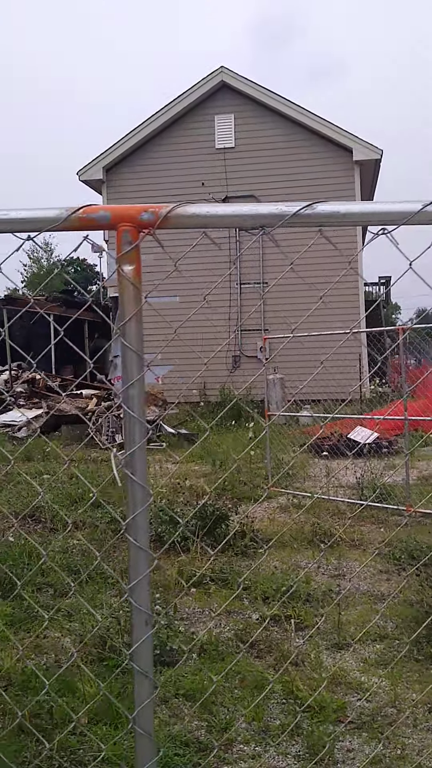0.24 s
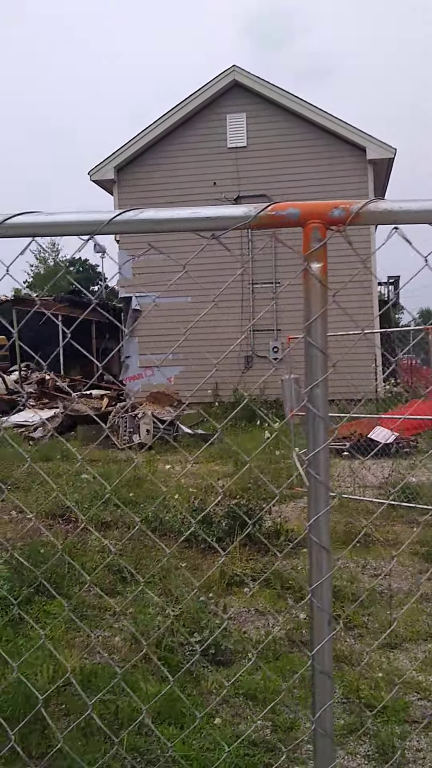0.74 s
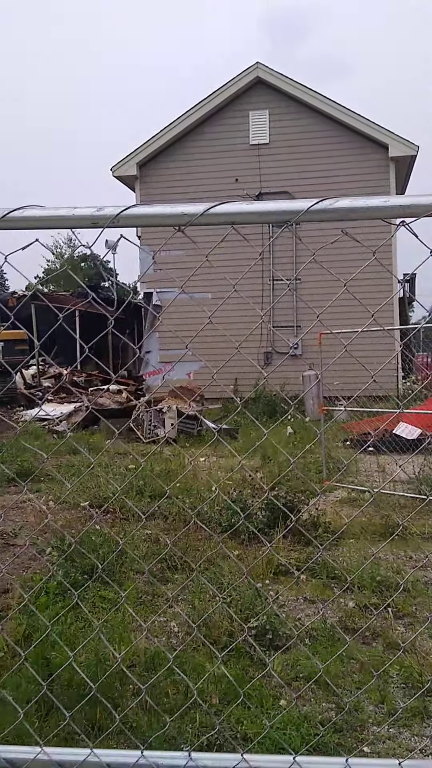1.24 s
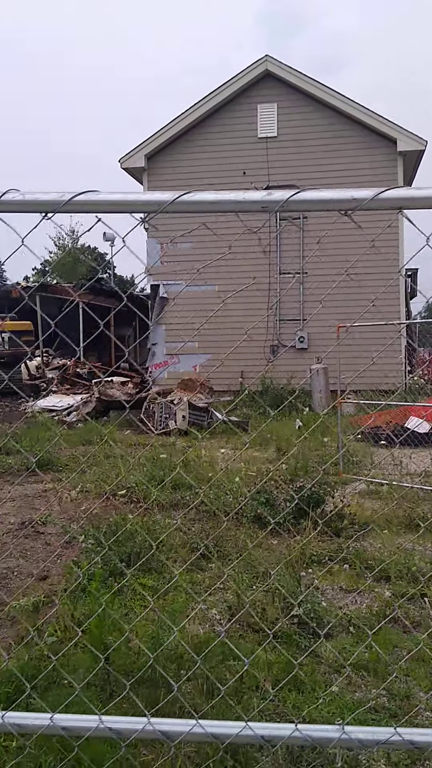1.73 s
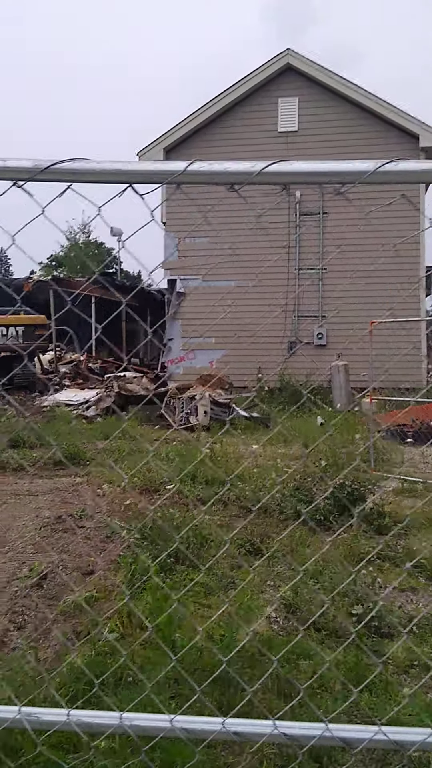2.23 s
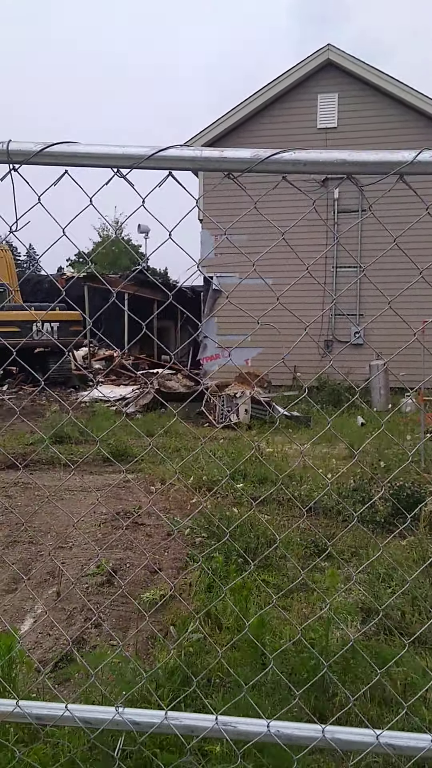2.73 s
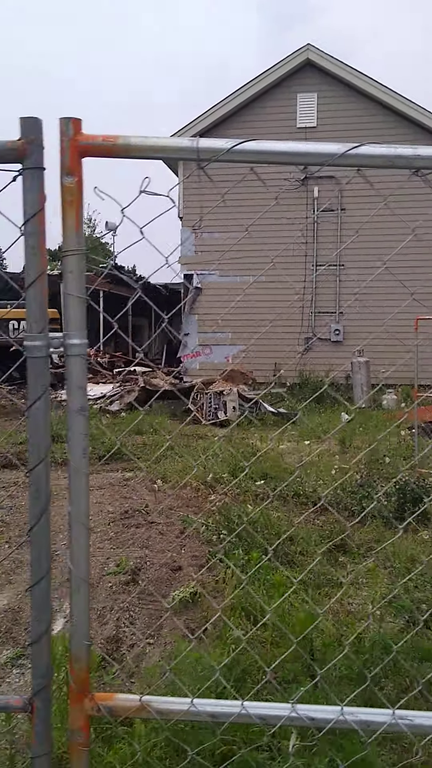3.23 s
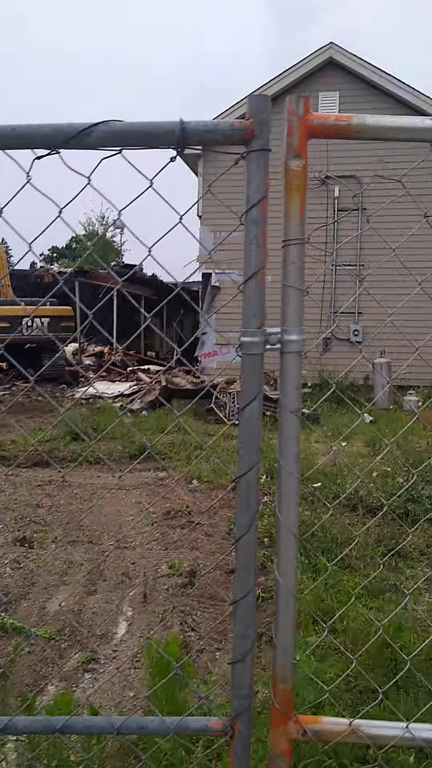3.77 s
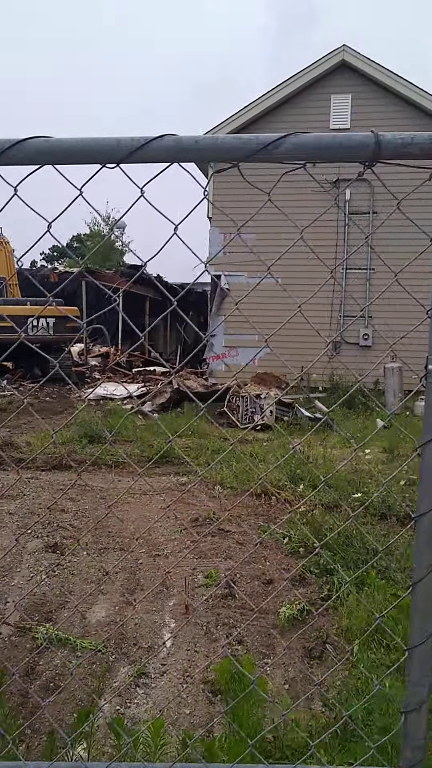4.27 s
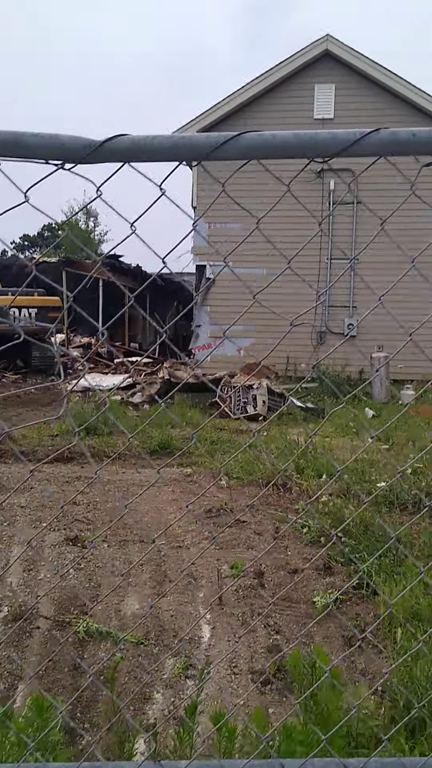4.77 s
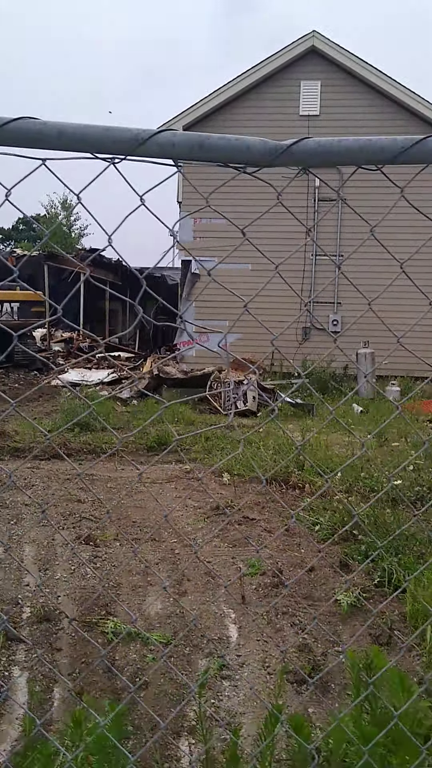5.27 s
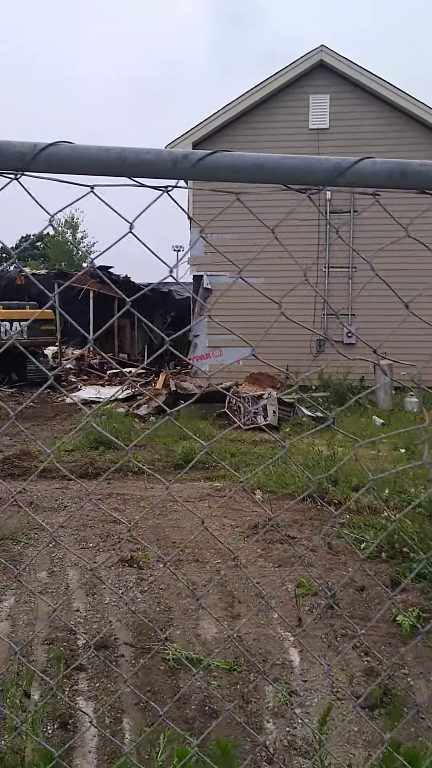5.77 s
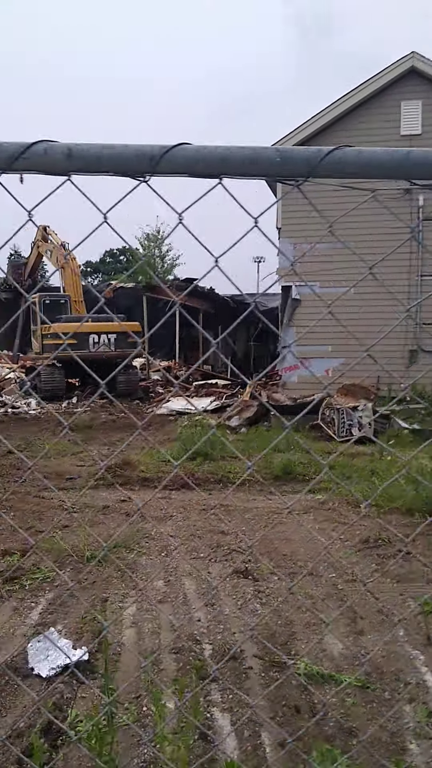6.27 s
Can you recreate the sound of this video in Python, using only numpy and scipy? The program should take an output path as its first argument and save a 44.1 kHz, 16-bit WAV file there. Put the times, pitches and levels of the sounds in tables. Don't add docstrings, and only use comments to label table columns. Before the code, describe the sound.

A wooden house is demolished across an open yard, heard through a phone microphone with short scattered echoes. A low diesel drone, near 100 Hz, hums quietly throughout beneath faint fan hiss leaning right. From 0 to 0.4 s small knocks, cracks and glassy clinks; from 0.57 to 1.0 s a dense heavy crash of hollow planks, thuds and sliding debris, then loose ticks. At 1.5 s a second crash bursts out, bright and brittle, with a low thud, peaking again around 1.9 s. A lull follows, then sharp stick snaps at 2.55 and 2.8 s, clatter at 3.1 to 3.5 s and a rattling cluster at 3.8 to 4.2 s. Thereafter only sparse knocks at 4.6 to 5.4 s, with thin hydraulic whines. A final sharp crack and tumble comes at 5.8 to 6.0 s; a few ticks fade as the engine swells and sags in pitch until 6.5 s.

```python
import sys
import numpy as np
from scipy import signal
from scipy.fft import rfft, irfft, next_fast_len
from scipy.io import wavfile
from scipy.ndimage import uniform_filter1d

SR = 44100
rng = np.random.default_rng(int(sys.argv[2]) if len(sys.argv) > 2 else 0)


def makeup_ratio(level_db):
    decades = np.asarray(level_db, float) / 20
    return 10 ** decades


def persist_wave(psi):
    counts = np.round(np.clip(psi, -1, 1) * 32767).astype(np.int16)
    wavfile.write(sys.argv[1], SR, np.atleast_2d(counts).T)


N = 286738
SHORT_TIME = dict(fs=SR, nperseg=512, noverlap=384)

# (t/s, peak level/dB, treble re peak/dB, die-away/s)
PLANKS = [(.1182, -30.5, -9.5, 0.47), (.3203, -24.5, -65, 0.33), (.5719, -26, -0.5, 1),
          (.581, -17.5, -47, 1), (.6192, -22, -17, 1), (.6522, -14.5, -8, 0.95), (.6803, -17, -36, 0.13),
          (.7594, -16.5, -5, 0.26), (.8676, -17, -7.5, 0.3), (.9794, -21, -9.5, 0.13),
          (1.5544, -19.5, -45, 0.063), (1.8674, -17, -9, 0.71), (1.8871, -14, -8, 0.18),
          (2.7175, -33, -26, 0.056), (2.814, -26, -8.5, 0.16), (3.1363, -22.5, -35, 0.34),
          (3.2493, -25, -15, 0.23), (3.8283, -21.5, -17.5, 0.17), (4.6997, -33.5, -36, 1),
          (5.9309, -19, -13.5, 0.11)]
# (t/s, peak level/dB, treble re peak/dB, die-away/s)
PANES = [(.2942, -26, -8.5, 0.17), (.3996, -36, 0, 0.18), (.819, -25.5, -20, 1), (1.5181, -17.5, -2, 0.79),
         (1.534, -15, -37, 0.18), (1.6079, -22, 6, 0.34), (1.704, -23, -5, 0.19), (1.7402, -22.5, -2, 0.85),
         (1.8178, -20.5, 17, 1), (2.9912, -29.5, -3.5, 0.32), (5.851, -31, 28, 0.25),
         (5.8784, -24, -10, 0.53)]
# (t/s, peak level/dB, treble re peak/dB, die-away/s)
LATHS = [(1.9194, -19.5, -3, 0.36), (1.9924, -21, -14.5, 0.29), (2.535, -18.5, -18.5, 0.3),
         (2.5628, -21, -23, 0.29), (2.7578, -31, -7, 0.54), (2.7721, -22, -10.5, 0.13),
         (2.8373, -28, -17.5, 1), (3.1168, -23.5, -9, 0.25), (3.1615, -17, -7.5, 0.25),
         (3.3703, -24, -18, 1), (3.4739, -18.5, -4, 0.32), (3.5094, -21, -5, 0.18), (3.5401, -23, -8, 0.55),
         (3.911, -19, -6.5, 0.16), (3.9594, -44, 8, 0.43), (3.9848, -21.5, -16, 0.18),
         (4.0089, -16.5, -4, 0.22), (4.0652, -27, -30, 0.2), (4.1003, -21, -12, 0.27),
         (4.566, -20, -11, 0.13), (5.898, -14.5, -12, 0.14), (6.0087, -57, -1, 0.13)]
# (t/s, peak level/dB, treble re peak/dB)
CHIPS = [(.0044, -27, -7.5), (0.156, -26, -42), (1.1428, -22, -28), (1.1695, -40, -26), (1.254, -30.5, -14),
         (2.159, -28, -15), (2.368, -25.5, -23.5), (2.419, -35, -7), (3.091, -27.5, -57),
         (4.3913, -24, -30), (4.4567, -31, -19), (4.753, -25.5, -12), (4.877, -31.5, -4), (5.24, -28, -49),
         (5.288, -30.5, -18), (5.408, -28, -63), (5.781, -26.5, -51), (5.799, -27, -9), (6.109, -33, -3),
         (3.809, -42, -21), (4.901, -35, -16), (6.06, -41, -49), (6.165, -40, -24), (1.3178, -40, -11)]


def breaking_boards():
    hits = np.zeros((N, 2))
    chips = [(*row, 0.15) for row in CHIPS]
    kinds = [(PLANKS, 3.64, -5.5), (PANES, 4.6, -25), (LATHS, 3.12, -47), (chips, 2.12, -14)]
    for rows, top, body_db in kinds:
        for s, db, treble_db, t60 in rows:
            add(hits, s, crack(db, treble_db, top, t60, body_db).T)
    return hits.T


def crack(db, treble_db, top, t60, body_db):
    hz, t, z = shower(round(.3 * SR))
    treble_octaves = np.clip(np.log2((hz + 1) / 4000), 0, 2)
    depth_db = 8.3 + 2.1 * treble_octaves * np.minimum(t / 0.072, 1)
    modes = np.minimum(patches(z.shape[1:], 1, 57.7), 1.7)
    rings_db = depth_db * (modes - 0.8) + 5.7
    band_t60 = np.clip(t60, .03, 1.2) * (2000 / np.maximum(hz, 500)) ** 0.51
    z = z * makeup_ratio(wood_db(hz, treble_db, top, body_db) + rings_db - 60 * t / band_t60)
    sound = signal.istft(z, **SHORT_TIME)[1]
    age = np.arange(sound.shape[1]) / SR
    onset = 1 - np.exp(-age / 0.0007)
    sound = sound * onset * makeup_ratio(1.7 * np.exp(-age / 0.0034))
    return makeup_ratio(db - 15.0) * sound / np.std(sound[:, :700])


# (f/Hz, likeness)
WOOD_SAME = [(60, 1), (180, 1), (550, 0.4), (1650, 0.96), (4970, 0.1), (15000, 0.55)]


def shower(length):
    noise = rng.standard_normal((2, length))
    size = np.minimum(rng.exponential(1, length), 4)
    clumps = evened(uniform_filter1d(size - size.mean(), size=160))
    clicks = noise * makeup_ratio(2.2 * size + 2.3 * clumps)
    hz, t, (left, other) = signal.stft(clicks, **SHORT_TIME)
    same = np.clip(read(WOOD_SAME, hz), 0, 1)[:, None]
    right = same * left + np.sqrt(1 - same ** 2) * other
    return hz[:, None], t, np.array([left, right])


# (f/Hz, level per Hz/dB)
WOOD = [(530, -30), (900, -48), (1100, -7), (1600, -7), (2830, -7.5), (3040, -7.5), (3310, -10.5),
        (6530, -19), (10400, -24.5), (15600, -29)]


def wood_db(hz, treble_db, top, body_db):
    octaves = np.log2((hz + 1) / 1000)
    treble = np.clip((octaves - 1.4) / 1.45, 0, 1)
    boards_db = read(WOOD, hz) + treble * (treble_db + 14.0) - 24 * np.maximum(octaves - top, 0)
    body = np.exp(-((octaves + 0.012) / 0.3) ** 2)
    return 10 * np.log10(makeup_ratio(2 * boards_db) + body * makeup_ratio(2 * (body_db - 4.5)))


# (t/s, level/dB, ring f/Hz, second ring f/Hz, ring time/s)
THUDS = [(.15, -38.5, 780, 1250, 0.038), (0.591, -47.5, 349, 487, 0.77), (0.661, -34, 459, 514, 0.18),
         (.77, -32, 821, 957, 0.1), (.655, -31, 819, 941, 0.27), (.88, -42.5, 385, 624, 0.063),
         (1.019, -52, 536, 537, 0.19), (1.517, -26, 198, 222.4, 0.19), (1.519, -32, 486, 557, 0.42),
         (1.78, -52, 542, 570, 0.15), (1.92, -45, 548, 620, 0.076), (1.879, -35, 878, 939, 0.15),
         (2.812, -26, 630, 767, 0.047), (4.018, -59, 383, 384, 0.27), (5.212, -37.5, 783, 830, 0.03),
         (5.228, -42.5, 565, 581, 0.14), (5.85, -35, 311, 436, 0.11), (5.894, -37, 348, 482, 0.11)]
# (t/s, level/dB, ring f/Hz, second ring f/Hz, ring time/s)
SCRAPS = [(.005, -45.5, 3203, 3166, 0.07), (.12, -44.5, 6580, 7200, 0.088), (0.123, -51, 4060, 3070, 0.18),
          (.128, -43.5, 3170, 11800, 0.034), (0.292, -38.5, 9150, 9700, 0.078),
          (.296, -45, 6640, 4270, 0.11), (0.399, -48.5, 4310, 3120, 0.079), (1.165, -35, 3890, 4130, 0.033),
          (1.228, -51, 3110, 3150, 0.12), (1.288, -56, 9480, 9500, 0.25), (2.158, -42, 1410, 1590, 0.26),
          (2.419, -43.5, 3110, 3540, 0.11), (2.555, -33.5, 1033, 3000, 0.14),
          (2.731, -39.5, 994, 3830, 0.071), (2.77, -27, 3425, 2477, 0.047),
          (2.987, -38.5, 966, 3680, 0.089), (4.096, -38.5, 1307, 886, 0.069), (4.56, -40, 4650, 2010, 0.14),
          (4.693, -41, 966, 1270, 0.12), (5.242, -31, 1240, 1485, 0.088), (5.28, -45.5, 3470, 2800, 0.11),
          (1.14, -44, 4220, 4820, 0.042), (1.19, -44, 965, 975, 0.073), (1.251, -40, 3120, 4130, 0.059),
          (1.316, -51, 3140, 3200, .06), (1.346, -51.5, 3136, 3210, 0.068), (1.39, -53, 9450, 6360, .15),
          (3.089, -41, 1233, 1920, 0.1), (3.369, -46, 4900, 3700, 0.15), (3.789, -53, 5130, 4130, 0.13),
          (5.407, -46, 1316, 2100, 0.041), (5.872, -60, 13900, 12300, .3), (6.108, -44.5, 7600, 8600, .04),
          (6.02, -54.5, 6930, 7300, 0.14), (2.365, -37.5, 3205, 2104, 0.058),
          (2.54, -56.5, 10670, 9200, 0.52), (0.2, -59, 9600, 9700, 0.2), (.294, -51, 15200, 12100, 0.22)]
# (t/s, peak level/dB, ring f/Hz)
SNAPS = [(0.025, -39, 2010), (0.153, -39, 1870), (0.192, -29, 1935), (0.209, -46, 2130),
         (0.239, -31, 1940), (0.249, -32, 1970), (0.296, -47, 9700), (0.318, -28, 2260),
         (0.345, -43, 2500), (0.58, -38, 2310), (0.595, -32, 2220), (0.603, -29, 1595),
         (0.624, -34, 2110), (0.632, -41, 2080), (0.653, -22, 2160), (0.67, -14.5, 1660),
         (0.682, -31, 2410), (0.698, -31, 2090), (0.73, -18, 2194), (0.779, -26.5, 1164),
         (0.819, -24, 3080), (0.847, -21, 2840), (0.871, -25, 3130), (0.88, -21, 1840),
         (0.893, -30, 2990), (0.902, -33, 1770), (0.915, -31, 2280), (0.944, -40, 3070),
         (0.96, -36, 1860), (0.976, -33, 3130), (0.985, -35, 2180), (1.024, -49, 2200),
         (1.087, -28, 1900), (1.098, -30, 1715), (1.141, -40, 2250), (1.157, -39, 1940),
         (1.167, -25.5, 1853), (1.2, -46, 1870), (1.253, -26, 1740), (1.276, -49, 2040),
         (1.533, -35, 2070), (1.541, -35, 2220), (1.557, -31, 2160), (1.621, -23.5, 9900),
         (1.688, -50, 1690), (1.709, -25, 1990), (1.733, -31, 2080), (1.776, -26.5, 1458),
         (1.87, -24, 2440), (1.891, -14, 6470), (1.918, -18, 2063), (1.94, -19, 1480),
         (1.967, -22, 1643), (2.011, -29, 1810), (2.037, -41, 1680), (2.051, -27, 2090),
         (2.157, -32, 1475), (2.233, -31.5, 1746),
         (2.37, -52, 2250), (2.388, -53, 2040), (2.541, -22, 1960), (2.564, -20, 3045),
              (2.591, -39, 2240), (2.677, -40, 2230), (2.716, -28, 2025), (2.773, -23, 3400),
              (2.8, -32, 2290), (2.816, -26, 2370), (2.837, -49, 2000), (2.998, -27.5, 2165),
              (3.021, -35, 2140), (3.119, -27, 2050), (3.135, -25.5, 1830), (3.164, -42, 2040),
              (3.173, -34, 2830), (3.252, -34, 1990), (3.284, -34.5, 1630), (3.301, -30, 2500),
              (3.418, -31, 2220), (3.474, -15, 2365), (3.488, -24, 2160), (3.509, -23, 2110),
              (3.542, -23, 2180), (3.624, -29, 1380), (3.663, -36, 1890), (3.838, -26.5, 2340),
              (3.912, -19, 1980), (3.963, -24, 2110), (3.985, -22, 1746), (4, -37, 1450),
              (4.013, -22, 2380), (4.035, -31, 2320), (4.066, -20, 1460), (4.079, -25, 1325),
              (4.099, -18, 1432), (4.123, -43, 1730), (4.155, -37, 1840), (4.169, -28, 1535),
              (4.186, -34, 1690), (4.457, -30, 1910), (4.567, -26.5, 1974), (4.722, -31, 2120),
              (4.783, -31, 2040), (4.877, -27, 1820), (5.242, -44, 1230), (5.288, -42, 1880),
              (5.414, -28, 2130), (5.784, -52, 2310), (5.799, -38, 2220), (5.809, -25.5, 2210),
              (5.825, -27, 2510), (5.881, -27, 1990), (5.896, -20, 2340), (5.931, -27, 2475),
              (6.008, -28.5, 2200), (6.064, -45, 2270)]


def single_blows():
    blows = np.zeros(N)
    for s, *row in THUDS + SCRAPS:
        add(blows, s, thud(*row))
    for s, *row in SNAPS:
        add(blows, s, snap(*row))
    return signal.sosfilt(signal.butter(2, 110, "highpass", fs=SR, output="sos"), blows)


def thud(db, low_hz, high_hz, t60):
    t = np.arange(round(.35 * SR)) / SR
    contact_s = 0.083 * t60
    rise = 1 - np.exp(-t / 0.001)
    level = rise * makeup_ratio(db - 6.0 - 60 * np.maximum(t - contact_s, 0) / t60)
    shake = fuzzy(np.full(len(t), float(low_hz)), 60 + low_hz / 25)
    low, high = np.sin(2 * np.pi * low_hz * t), np.sin(2 * np.pi * high_hz * t)
    return level * (low + 0.98 * high + 1.11 * shake)


def snap(db, hz):
    t = np.arange(round(.06 * SR)) / SR
    spread, phase = rng.uniform(-1.066, 1, (2, 5, 1))
    ring_hz = hz * (1 + 0.2453 * spread)
    rings = evened(np.sin(2 * np.pi * ring_hz * t + np.pi * phase).sum(0))
    tick_band = signal.butter(2, [1500, 9000], "bandpass", fs=SR, output="sos")
    tick = evened(signal.sosfilt(tick_band, rng.standard_normal(len(t))))
    body = rings * makeup_ratio(-60 * t / 0.041) + tick * makeup_ratio(-2.5 - 60 * t / 0.016)
    return makeup_ratio(db - 5.5) * (1 - np.exp(-t / 0.0016)) * body


# (f/Hz, level/dB)
PANE_A = [(4134, -64), (5044, -64), (6460, -76), (7122, -78), (9652, -91), (11827, -79), (15246, -92)]
PANE_B = [(3790, -74), (4371, -69), (4770, -76), (5297, -79), (6492, -68), (7122, -68), (9028, -61),
          (9604, -62), (10481, -80), (12225, -76), (13738, -76), (15391, -80)]
PANE_C = [(6207, -81), (6293, -83), (6519, -75), (6600, -72), (7881, -76), (8533, -83), (9249, -83),
          (9895, -88), (10605, -89), (11197, -92)]
PANE_D = [(3822, -59.5), (5259, -75), (6756, -84), (7337, -79), (7870, -67), (10228, -77), (11197, -64.5),
          (12748, -81), (13286, -86)]
# (t/s, level over its modes/dB, ring time/s, left-right level/dB)
PANE_BLOWS = [
    (.121, 5, 0.21, 6),
    (.294, 2, 0.38, 14),
    (2.537, 4, .4, 6),
    (2.991, 9, .25, 0),
]


def ringing_panes():
    panes = np.zeros((N, 2))
    for rings, (s, *row) in zip((PANE_A, PANE_B, PANE_C, PANE_D), PANE_BLOWS):
        add(panes, s, clink(rings, *row))
    return panes.T


def clink(rings, db, t60, pan_db):
    t = np.arange(round(.3 * SR)) / SR
    out = 0
    for hz, ring_db in rings:
        voice = np.sin(2 * np.pi * hz * t) + 0.84 * fuzzy(np.full(len(t), float(hz)), 170)
        line_t60 = t60 * (6000 / hz) ** 0.3
        out = out + voice * makeup_ratio(ring_db - 60 * t / line_t60)
    pan = makeup_ratio(np.array([pan_db, -pan_db]) / 2)
    return np.outer(makeup_ratio(db) * (1 - np.exp(-t / 0.0015)) * out, pan)


# (full at t/s, held for/s, level/dB, treble re level/dB)
SLIDES = [(.7, 0.087, -28, -8), (.93, 0.036, -34.5, -14), (1.66, 0.13, -54, 14), (2.1, 0.61, -49.5, -4),
          (2.68, 0.039, -34.5, -29), (3.128, 0.14, -33.5, -20.5), (3.42, 0.1, -37, -13),
          (3.867, 0.2, -35, -11), (4.3, 2.6, -53.5, -2), (5.928, 0.01, -30.5, -17.5),
          (6.1, 0.062, -37, -32)]


def heap():
    rise_db_per_s, fall_db_per_s = 111, 82
    hz, t, z = shower(N)
    power = 0
    for s, hold, db, treble_db in SLIDES:
        before, after = np.maximum(s - t, 0), np.maximum(t - s - hold, 0)
        level_db = db - rise_db_per_s * before - fall_db_per_s * after
        power = power + makeup_ratio(2 * wood_db(hz, treble_db, 3.4, -51)) * makeup_ratio(2 * level_db)
    clumps_db = 2.9 * wander(45)[np.minimum((t * SR).astype(int), N - 1)]
    rings_db = 5.33 * patches(z.shape[1:], 1, 40)
    z = z * np.sqrt(power) * makeup_ratio(clumps_db + rings_db + 0.5)
    return signal.istft(z, **SHORT_TIME)[1][:, :N]


# (f/Hz, t60/s)
YARD = [(300, 0.026), (1500, 0.44), (4000, 0.4), (10000, 0.11)]


def yard(x):
    taps = np.zeros((2, SR // 2))
    slots = np.arange(300, SR // 2 - 20, 20)
    at = slots + rng.integers(0, 20, (2, len(slots)))
    np.put_along_axis(taps, at, rng.choice([-1., 1.], at.shape), 1)
    hz, t, z = signal.stft(taps, SR, nperseg=256)
    decay = makeup_ratio(-60 * t / read(YARD, hz)[:, None])
    tail = signal.istft(z * decay, SR, nperseg=256)[1]
    tail = tail + 0.37 * tail[::-1]
    return signal.fftconvolve(x[None], tail / np.linalg.norm(tail[0]), axes=1)[:, :N]


# (f/Hz, left-right level/dB)
WOOD_BALANCE = [(60, 9), (110, -3), (200, -3), (380, 3), (700, 3), (1290, -3.5), (2380, -4), (4400, 6),
                (8120, 4.5), (15000, 13.5)]


def debris():
    hits, blows = breaking_boards(), single_blows()
    echoes = yard(makeup_ratio(-10.5) * hits.mean(0) + makeup_ratio(-9.5) * blows)
    return ports(hits + heap() + ringing_panes() + blows + echoes, WOOD_BALANCE)


# (start t/s, length/s, level/dB, centre f/Hz, width/Hz)
WHINES = [
    (3.3, 2.35, -64, 1225, 70),
    (4.74, 1.08, -71.5, 3800, 80),
    (5.22, .62, -75, 4085, 110),
    (6.2, .34, -76.5, 4060, 100),
    (4.47, .32, -75, 9980, 100),
    (4.72, .27, -73.5, 10130, 130),
    (4.85, .3, -82, 5180, 60),
    (5.6, .26, -77, 5205, 90),
    (4.9, .9, -71, 2880, 90),
]
# (f/Hz, left-right level/dB)
WHINE_BALANCE = [(1200, -14), (3800, -3), (4100, -10), (5200, -8), (10000, -6)]


def hydraulics():
    edge_s, sway_db, tone_share = .07, 1.2, .45
    out = np.zeros(N)
    for start, length, db, hz, width in WHINES:
        t = np.arange(0, length, 1 / SR)
        opening = np.clip(np.minimum(t, length - t) / edge_s, 0, 1)
        valve = opening * makeup_ratio(sway_db * wander(7.82)[:len(t)])
        path_hz = hz * (1 + .003 * wander(3.9)[:len(t)])
        tone = np.sqrt(2) * np.sin(2 * np.pi * np.cumsum(path_hz) / SR)
        voice = tone_share * tone + np.sqrt(1 - tone_share ** 2) * fuzzy(path_hz, width)
        add(out, start, valve * makeup_ratio(db + 11.0) * voice)
    return ports(out, WHINE_BALANCE)


# (t/s, firing f/Hz, level/dB)
FIRING = [
    (0.0, 100.2, -58),
    (1.5, 100.7, -61.5),
    (2.1, 99.9, -63.5),
    (2.9, 100.1, -63.5),
    (3.55, 98.2, -58),
    (4.36, 97.23, -59.5),
    (6.25, 98.36, -52.5),
    (6.5, 94.1, -51.5),
]
# (multiple of firing, level/dB)
ORDERS = [(1.5, -7), (2, -6), (2.5, -8), (3, -15.5)]
# (f/Hz, level at the start/dB, level change per s/dB)
DRONES = [(59, -62, -1.07), (117.4, -63, -1), (228.2, -69, -0.28)]
# (f/Hz, level per Hz/dB)
RUMBLE = [(15, -51), (28, -35), (44, -16), (98, -4), (114, -12), (130, -1), (237, -4.5), (320, -13.5),
          (776, -14), (1100, -13.5), (1430, -65), (2420, -120)]


def diesel():
    t = np.arange(N) / SR
    hz, db = columns(FIRING, t)
    turns = np.cumsum(hz) / SR
    tone = np.cos(2 * np.pi * turns) * makeup_ratio(db + 0.5 * wander(23))
    for k, order_db in ORDERS:
        order = np.cos(2 * np.pi * k * turns + 1.05 * wander(12))
        tone = tone + order * makeup_ratio(-61.5 + order_db + 3.6 * wander(7.3))
    for drone_hz, drone_db, change_db in DRONES:
        drone = np.cos(2 * np.pi * drone_hz * t + 0.29 * wander(14))
        tone = tone + drone * makeup_ratio(drone_db + change_db * t + 4.3 * wander(5.6))
    rumble = evened(wash(lambda hz: read(RUMBLE, hz), lambda hz: 1 - hz / 9000, patchy_db=2.5))
    return np.sqrt(2) * tone + makeup_ratio(-59.5) * rumble


# (f/Hz, level per Hz/dB)
HISS = [(500, -36), (800, 2.5), (1400, -6.5), (2100, -8.5), (3200, -14.5), (4500, -23), (7000, -16.5),
        (12000, -14), (14600, -22), (15700, -12)]
# (f/Hz, left-right level/dB)
HISS_BALANCE = [(800, 7), (1250, -6.5), (1600, -3.5), (1850, -13), (2250, -13), (2550, -7), (3200, -7),
                (4500, -9.5), (9000, 3.5), (15000, 14)]
# (f/Hz, likeness)
HISS_SAME = [(800, 0.9), (2000, 0.81), (6000, 0.051)]


def fan():
    def colour_db(hz):
        return read(HISS, hz) + gate_depth_db(hz) - np.outer([0, 1], read(HISS_BALANCE, hz))
    return makeup_ratio(-56.5 - 22.5) * wash(colour_db, lambda hz: read(HISS_SAME, hz), patchy_db=2.5)


def wash(colour_db, same, patchy_db):
    frames, hz = N // 256 + 5, np.fft.rfftfreq(1024, 1 / SR)
    a, b, c, d = rng.standard_normal((frames, 513, 4)).T
    same = np.clip(same(hz), 0, 1)[..., None]
    left = a + 1j * b
    right = same * left + np.sqrt(1 - same ** 2) * (c + 1j * d)
    level_db = colour_db(hz)[..., None] + patchy_db * patches(a.shape, 2, 40)
    z = np.array([left, right]) * makeup_ratio(level_db)
    return signal.istft(z, nperseg=1024, noverlap=768)[1][:, :N]


def ports(x, balance, lead=3.63):
    size = next_fast_len(N)
    hz = np.fft.rfftfreq(size, 1 / SR)
    half = makeup_ratio(read(balance, hz) / 2) * np.exp(1j * np.pi * hz * lead / SR)
    gains = np.array([half, 1 / half]) / (abs(half) + 1 / abs(half)) * 2
    return irfft(rfft(x, size) * gains, size)[:, :N]


def fuzzy(hz, width):
    r = np.exp(-np.pi * width / SR)
    slow = rng.standard_normal(len(hz)) + 1j * rng.standard_normal(len(hz))
    for _ in range(2):
        slow = signal.lfilter([1 - r], [1, -r], slow)
    carrier = np.exp(2j * np.pi * np.cumsum(hz) / SR)
    return evened((slow * carrier).real)


def patches(shape, tall, long):
    field = rng.standard_normal(shape[::-1]).T
    field = uniform_filter1d(field, max(round(tall), 1), 0)
    return evened(uniform_filter1d(field, max(round(long), 1), 1))


def wander(rate):
    knots = rng.standard_normal(400)
    return np.interp(np.arange(N) * rate / SR, np.arange(400), knots)


def evened(x):
    return x / np.sqrt(np.mean(abs(x) ** 2) + 1e-20)


def read(points, hz):
    f, value = np.transpose(points)
    return np.interp(np.log(hz + 1), np.log(f + 1), value)


def columns(rows, t):
    s, *values = np.transpose(rows)
    return [np.interp(t, s, v) for v in values]


def add(mix, s, sound):
    part = mix[round(s * SR):][:len(sound)]
    part += sound[:len(part)]


def scene():
    return debris() + hydraulics() + diesel() + fan()


def gate_depth_db(hz):
    return 19 * np.clip((hz - 750) / 250, 0, 1)


def gate(x):
    margin_db = 6.5
    hz, _, z = signal.stft(x, **SHORT_TIME)
    power = signal.lfilter([.14], [1, -.86], abs(z) ** 2)
    power_db = 10 * np.log10(power + 1e-16)
    quiet_db = uniform_filter1d(np.percentile(power_db[0], 12, axis=1), size=3)[:, None]
    opened = np.clip((power_db - quiet_db - margin_db) / 5.42, 0, 1)
    closing = np.arange(z.shape[2]) * 0.022
    opened = np.maximum.accumulate(opened + closing, axis=2) - closing
    gain = makeup_ratio(-gate_depth_db(hz)[:, None] * (1 - opened))
    return signal.istft(z * gain, **SHORT_TIME)[1][:, :N]


def top_cut(x):
    return signal.sosfilt(signal.butter(12, 15660, fs=SR, output="sos"), x)


def record(dry):
    band_limit = signal.firwin(511, 15550, window=("kaiser", 9), fs=SR)
    finished = signal.oaconvolve(gate(dry), band_limit[None], "same")
    return top_cut(finished)


dry = scene()
out = record(dry)
persist_wave(out)
```